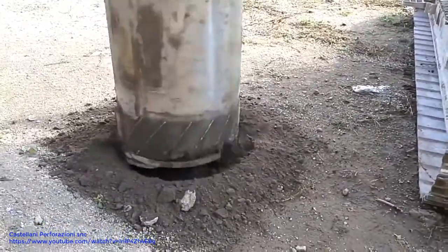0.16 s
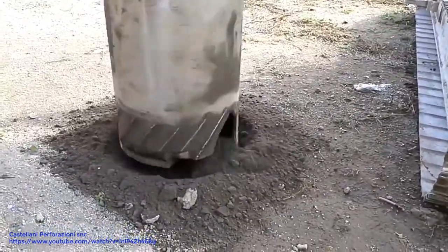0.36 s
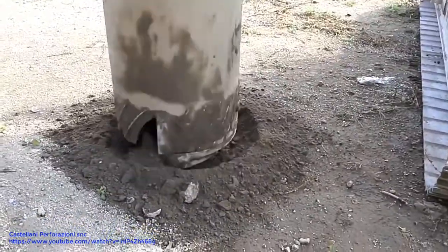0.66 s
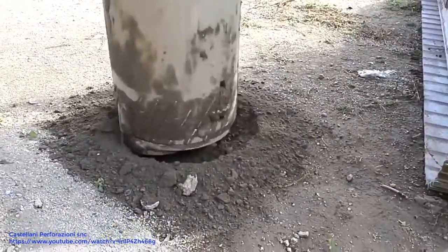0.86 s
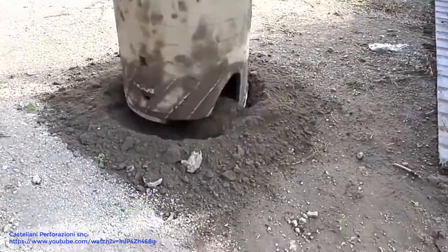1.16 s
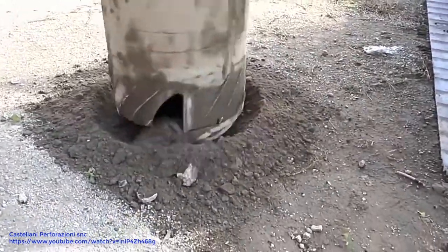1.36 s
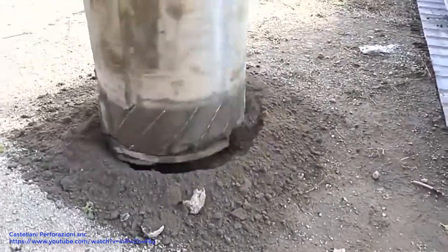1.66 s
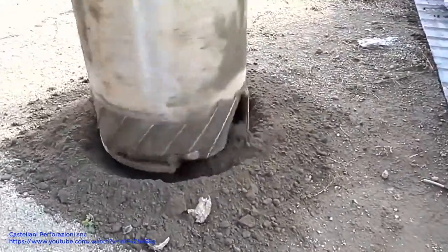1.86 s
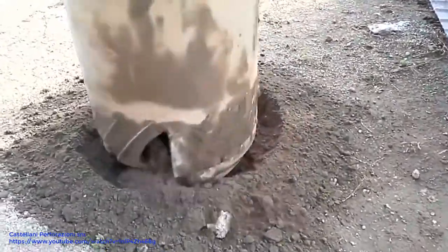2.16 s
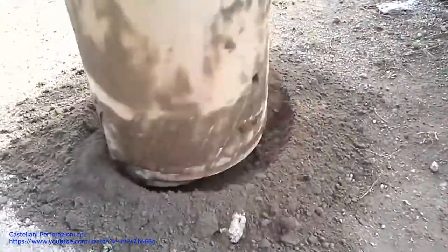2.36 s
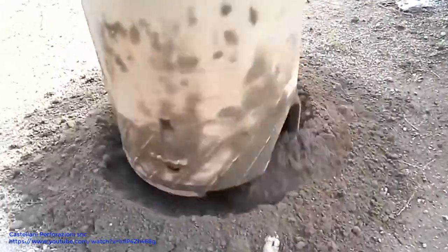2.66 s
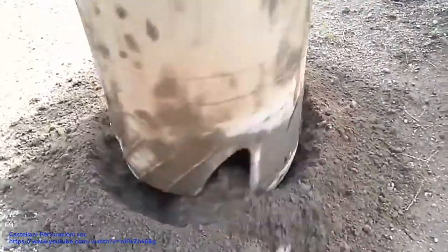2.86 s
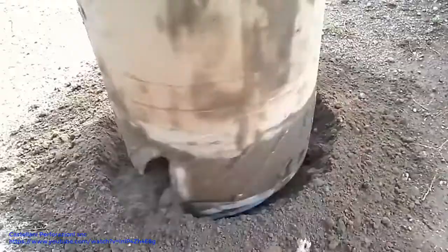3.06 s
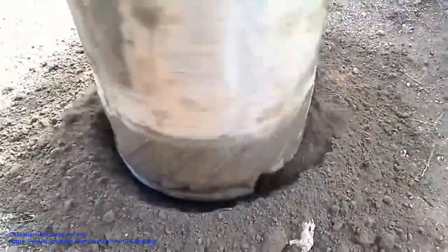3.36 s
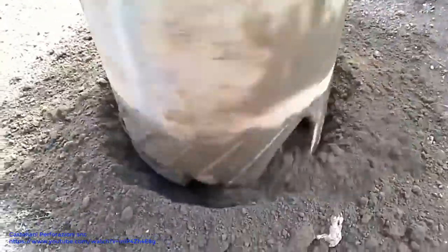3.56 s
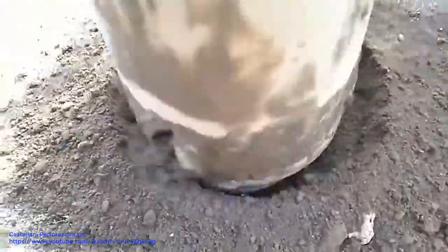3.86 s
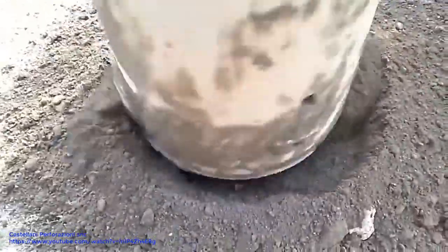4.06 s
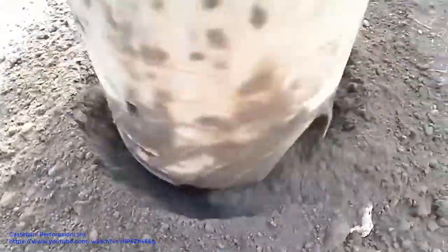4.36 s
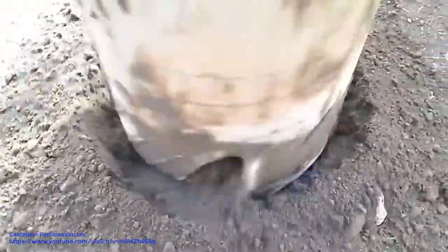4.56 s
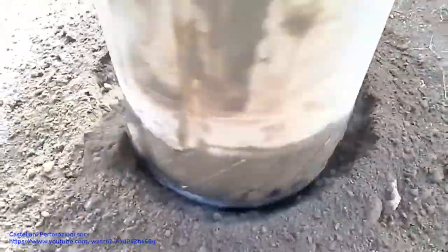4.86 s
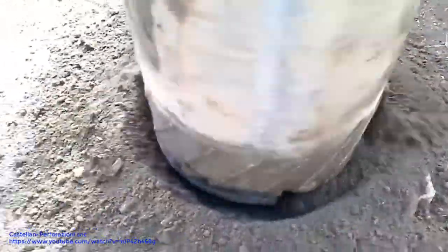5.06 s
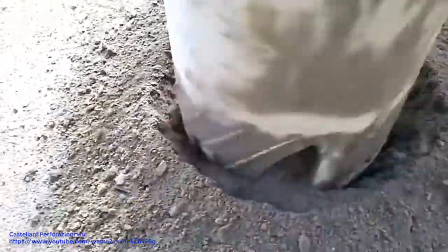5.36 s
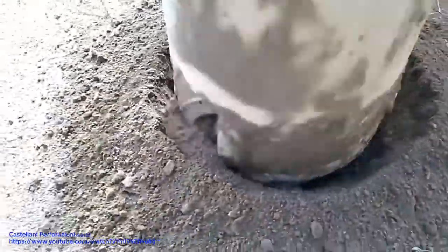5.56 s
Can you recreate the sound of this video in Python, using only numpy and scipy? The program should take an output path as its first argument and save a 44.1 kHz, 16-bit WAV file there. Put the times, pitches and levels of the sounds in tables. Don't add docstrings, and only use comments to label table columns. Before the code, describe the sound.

A diesel engine and hydraulic rotary drive run without pause, whining around a mid pitch with rough air roar and clatter. The rotating steel tube rattles and clanks irregularly from the start, with stones knocking it and faint high metallic pings. The drive whine grows on approach while the engine becomes partly hidden. Open air, dry, harsh, compressed handheld sound.

```python
import sys
import numpy as np
from scipy import signal
from scipy.io import wavfile
from scipy.ndimage import uniform_filter1d, minimum_filter1d

SR = 44100
rng = np.random.default_rng(int(sys.argv[2]) if len(sys.argv) > 2 else 0)


def field_ratio(decibels):
    return 10 ** (np.asarray(decibels, dtype=float) / 20)


def wav_record(signal):
    frames = np.transpose(np.atleast_2d(signal))
    bounded = np.clip(frames, -1, 1)
    quanta = np.round(bounded * 32767).astype(np.int16)
    wavfile.write(sys.argv[1], SR, quanta)


N = 252363

# t/s, how far the engine is hidden behind the casing (0 open, 1 hidden, above 1
# deeper in its shadow), pump effort level/dB
STANCE = [(0, 0.02, -0.5), (1.2, 0.07, 1.5), (1.6, 0.4, 0), (2.0, 0.28, -1), (2.4, 0.7, 1.5), (2.8, 0.8, 1),
          (3.2, 1.05, -1), (3.6, 1, -4), (4.0, .75, -6.5), (4.4, .85, -5), (4.8, 0.9, -11),
          (5.2, 0.7, -2.5), (5.72, 1.36, -9.5)]

CRANK_ORDERS = [1.5, 5, 6, 6.5, 10, 12, 13, 13.5, 14, 14.5, 19.5, 20, 20.5, 21, 31, 33, 34.5]
CRANK_DB = [-60, -42, -32, -37, -29, -33, -31, -36, -35, -35, -41, -36, -36, -37, -41, -44, -41]
CRANK_HZ, CRANK_SETTLES_HZ, CRANK_SETTLE_S = 33.97, .13, 2.4
FAN_BEAT_HZ, FAN_BEAT_S = 4.9, .15
FIRING_DB, FIRING_SHADE_DB, FIRING_FOLLOWS = -28, 6.5, 0.55

STROKE_DB = [-17, -28.5, -20.5]
PUMP_ORDERS = [36, 45, 54, 63, 72, 99]
PUMP_DB = [-8.5, -34, -17, -12, -8.5, -17.5]
PUMP_SHADE_DB = [11, 7, 3.7, 5, 11.3, 5.9]
THIRD_SHADE_DB, WOBBLE_ORDER = 18, 26 / 3

MOTOR_ORDERS = [1, 2, 4, 5, 4.18, 3, 6, 8]
MOTOR_DB = [-18.5, -31, -32, -33, -43, -41, -44, -45]
MOTOR_RISE_DB_PER_S = [0.72, 1.06, .65, 1.31, 2.64, 1.2, 0.71, 1.2]
MOTOR_ROUGH_DB = [1.2, 2.5, 2.0, 2.0, 2.0, 4.0, 4.0, 4.0]
GEAR_ORDERS = [2.09, 6.27, 8.36, 10.45, 12.54]
GEAR_DB = [-2.5, -4, 7, 1, -10.5]
# t/s, sag f/Hz, half-length/s
BITES = [(.08, 10, .07), (.42, 5.5, .06), (1.0, 9.5, .17), (1.49, 10.5, .08), (2.1, 10.5, .17),
         (2.62, 5.8, .09), (3.06, 18, .1), (3.35, 5.5, .12), (3.67, 8.5, .11), (4.11, 14.5, .1),
         (4.45, 9.5, .15), (4.98, 6, .14), (5.25, 3.5, .1), (5.57, 19, .2)]
# t/s, extra path of the ground echo/m, oil pressure level/dB
ECHO = [(0, 1.596, .4), (.62, 1.596, -1.9), (.89, 1.729, 1.7), (.98, 1.585, 3.5), (1.27, 1.509, -5),
        (1.58, 1.546, .5), (1.66, 1.709, -1.4), (1.97, 1.91, -.6), (2.41, 2.045, 1.6), (2.98, 2.02, -.4),
        (3.28, 1.823, 2.6), (3.7, 1.86, 1.5), (3.98, 1.655, -2.5), (4.42, 1.602, 1.6), (4.62, 1.491, 2.8),
        (5.1, 1.494, 0), (5.2, 1.456, 1), (5.72, 1.236, -2)]
FREE_HZ = 363
ECHO_SHARE, SOUND_M_PER_S = .7, 343
TOOTH_DB, TOOTH_RISE_DB_PER_S, TOOTH_DB_PER_SAG, CLOSEST_S = -57.5, 4, 0.46, 4.7

# f/Hz, level/dB per Hz
ROAR = [(30, -45.5), (60, -26), (90, -20.5), (170, -10.5), (250, -6), (340, -3), (410, -6.5), (480, 0),
        (560, -11), (720, -8), (1000, -14.5), (1460, -20.5), (2000, -39), (3200, -38.5)]
# f/Hz, level/dB per Hz
CLATTER = [(900, -3), (1300, 3), (1700, -2), (2300, -0.5), (3100, -3.5), (3700, -1), (4200, -3.5),
           (4700, -9.5), (5300, -22.5), (6500, -30.5)]
# f/Hz, level/dB per Hz
HISS = [(5000, 3.5), (6000, -0.5), (7200, -6), (8400, -6.5), (9200, -14.5), (10000, -20)]
ROAR_DB, CLATTER_DB, HISS_DB, HISS_SHADE_DB = -18.5, -23.5, -42.5, 5.5
ROAR_YIELDS, CLATTER_YIELDS = 0.11, 0.17

# t/s, rms level/dB, length/s
CRUNCH = [
    (.0, -50, .02),
    (1.536, -43, .02),
    (1.972, -50, .022),
    (3.466, -46, .008),
    (5.393, -36, .004),
    (5.515, -53, .012),
]
# t/s, peak level/dB, f/Hz, t60/s
PIN = [(.0, -38.5, 10370, 0.33), (0.191, -53, 10370, 0.21), (1.555, -49, 10200, 0.24),
       (1.569, -49, 13100, 0.27), (1.852, -39, 11800, 0.096), (3.475, -50.5, 12000, .15),
       (3.5, -46.5, 10350, 0.61), (4.03, -41.5, 10340, 0.27), (4.028, -46, 13600, 0.12),
       (4.94, -45.5, 10300, 0.3), (5.365, -50, 13800, 0.16), (5.399, -54, 10300, .2),
       (5.514, -45.5, 10270, 0.22)]
# t/s, peak level/dB, t60/s
CLANKS = [(0.0094, -6, 0.39), (0.188, -7.5, 0.24), (0.316, -11, 0.2), (0.4409, -10.5, 0.39),
          (0.9202, -12, 0.37), (1.449, -9, 0.14), (1.5274, -3, 0.22), (1.5525, -6.5, 0.18),
          (1.9694, -25, 0.14), (1.9992, -14, 0.2), (2.6216, -1.5, 0.093), (2.9005, -12, 0.16),
          (3.04, -10, 0.21), (3.1926, -9.5, 0.17), (3.472, -4.5, 0.19), (4.0337, -9.5, 0.18),
          (4.5505, -18, 0.53), (4.93, -12.5, 0.35), (5.0599, -19, 0.2), (5.3694, -10.5, 0.29),
          (5.5154, -3, 0.23), (5.5794, -18, 0.2)]
# f/Hz, level/dB per Hz
CLANK = [(900, -7), (2000, 1.5), (3000, 1.5), (4000, 6.5), (5000, -6.5), (6500, -15.5), (9000, -33),
         (10500, -29)]
# t/s, peak level/dB, pitch f/Hz, t60/s
KNOCKS = [
    (0.119, -7, 697, 0.048),
    (0.623, -2.5, 515, 0.084),
    (1.449, -11, 681.5, 0.11),
    (3.848, -9.5, 441, 0.084),
    (4.169, -5, 582, 0.058),
    (5.096, -0.5, 740, 0.023),
    (5.519, -6, 702, 0.078),
]
# t/s, peak level/dB
GRIT = [
    (3.045, -37.5),
    (3.4177, -14),
    (5.718, -44),
]


def rms_one(x):
    return x / np.sqrt(np.mean(x ** 2) + 1e-20)


def in_time(rows):
    s, *columns = np.transpose(rows)
    return [np.interp(np.arange(N) / SR, s, column) for column in columns]


def drift(rate):
    r = np.exp(-80 * np.pi * rate / SR)
    noise = rng.standard_normal(N // 40 + 2002)
    slow = signal.lfilter([1], [1, -2 * r, r * r], noise)[2000:]
    return np.interp(np.arange(N) / 40, np.arange(len(slow)), rms_one(slow))


def coloured(spectrum, patchy_db, count):
    hz, db = np.transpose(spectrum)
    edges = hz[0] * 2 ** np.arange(0, np.log2(hz[-1] / hz[0]), 1 / count)
    white = rng.standard_normal((2, N))
    out = 0
    for k, (low, high) in enumerate(zip(edges, edges[1:])):
        band_pass = signal.butter(3, [low, high], "band", fs=SR, output="sos")
        band = signal.sosfilt(band_pass, white[k % 2])
        level_db = np.interp(np.log(low * high) / 2, np.log(hz), db)
        out = out + field_ratio(level_db + patchy_db * drift(9.6)) * band
    return rms_one(out)


def turns(hz):
    return 2 * np.pi * np.cumsum(hz) / SR


def line(phase, db, rough_db):
    waver = .08 * rough_db * drift(12)
    level = np.sqrt(2) * field_ratio(db + rough_db * drift(18))
    return level * np.sin(phase + waver + rng.uniform(0, 2 * np.pi))


def strikes(times, db):
    clicks = np.full(N, 1e-18)
    clicks[np.minimum((np.asarray(times) * SR).astype(int), N - 1)] = field_ratio(db)
    return clicks


def ring(clicks, hz, t60):
    r = field_ratio(-60 / (t60 * SR))
    w = 2 * np.pi * hz / SR
    return signal.lfilter([0, np.sin(w)], [1, -2 * r * np.cos(w), r * r], clicks)


def diesel(crank, firing_db):
    beat = 2 * np.pi * FAN_BEAT_HZ * (np.arange(N) / SR - FAN_BEAT_S)
    firing = 3 * crank
    out = np.sqrt(2) * field_ratio(firing_db) * (np.sin(firing) + field_ratio(-5.0) * np.sin(firing - beat))
    facing_db = 0.091 * (firing_db - np.mean(firing_db))
    for k, db in zip(CRANK_ORDERS, CRANK_DB):
        out = out + line(k * crank, db + facing_db, rough_db=2.0)
    return out


def pump(crank, effort_db, hidden):
    first_db = STROKE_DB[0] + effort_db
    third_db = STROKE_DB[2] - THIRD_SHADE_DB * hidden
    out = line(9 * crank, first_db, rough_db=.8)
    out += line(18 * crank, STROKE_DB[1], rough_db=2.0)
    out += line(27 * crank, third_db, rough_db=1.2)
    out += line(WOBBLE_ORDER * crank, first_db - 11, rough_db=1.5)
    for k, db, shade_db in zip(PUMP_ORDERS, PUMP_DB, PUMP_SHADE_DB):
        out += line(k * crank, db - 21.5 - shade_db * hidden, rough_db=2.1)
    return out


def sag():
    time = np.arange(N) / SR
    return sum(hz * np.exp(-.5 * ((time - s) / length) ** 2) for s, hz, length in BITES)


def echo_db(hz, path):
    lag = 2 * np.pi * hz * path / SOUND_M_PER_S
    return 10 * np.log10(1 + ECHO_SHARE ** 2 + 2 * ECHO_SHARE * np.cos(lag))


def rotary_drive():
    time = np.arange(N) / SR
    lost = sag()
    path, oil_db = in_time(ECHO)
    motor_hz = FREE_HZ - lost
    shaft = turns(motor_hz)
    out = 0
    for k, db, rise, rough in zip(MOTOR_ORDERS, MOTOR_DB, MOTOR_RISE_DB_PER_S, MOTOR_ROUGH_DB):
        place_db = rise * time + echo_db(k * motor_hz, path)
        pressure_db = min(0.2 * k, 1) * oil_db
        out = out + line(k * shaft, db + place_db + pressure_db, rough_db=rough)
    approach_db = TOOTH_RISE_DB_PER_S * np.minimum(time, CLOSEST_S)
    load_db = TOOTH_DB + approach_db + TOOTH_DB_PER_SAG * np.minimum(lost, 13)
    backlash = 0.19 * drift(72)
    for k, db in zip(GEAR_ORDERS, GEAR_DB):
        out = out + line(k * (shaft + 0.62 * backlash), db + load_db, rough_db=2.2)
    return out


def rig_noise(crank, hidden):
    whine_db = uniform_filter1d(echo_db(FREE_HZ, in_time(ECHO)[0]), size=8001)
    roar_db = ROAR_DB - ROAR_YIELDS * whine_db + 2.5 + 0.18 * np.cos(9 * crank) + 0.72 * drift(10.0)
    clatter_db = CLATTER_DB - CLATTER_YIELDS * whine_db + 1.5 + 0.29 * np.cos(3 * crank) + 1.27 * drift(10)
    out_of_sight = np.maximum.accumulate(hidden) ** 2
    hiss_db = HISS_DB - HISS_SHADE_DB * out_of_sight + 2.0 + 1.1 * drift(17.0)
    roar = field_ratio(roar_db) * coloured(ROAR, patchy_db=1.56, count=3)
    clatter = field_ratio(clatter_db) * coloured(CLATTER, patchy_db=1.0, count=6)
    return roar + clatter + field_ratio(hiss_db) * coloured(HISS, patchy_db=3.0, count=5)


def crunch():
    time = np.arange(N) / SR
    spray = 0
    for s, db, length in CRUNCH:
        past_end = np.maximum(time - s - length, 0)
        spray = spray + field_ratio(db - 420 * past_end ** .6) * (time >= s)
    grains = rng.standard_normal(N) * field_ratio(4 * drift(300))
    bright = signal.sosfilt(signal.butter(4, [7500, 14800], "band", fs=SR, output="sos"), grains)
    return spray * rms_one(bright)


def pin():
    out = 0
    for s, db, hz, t60 in PIN:
        blow = ring(strikes([s], db - 27.5), hz, 0.0078)
        out = out + ring(blow, hz, t60)
    return out * field_ratio(3.4 * drift(25))


def clanks():
    time = np.arange(N) / SR
    body = 0
    for s, db, t60 in CLANKS:
        age = np.maximum(time - s + 0.0087, 0)
        body = body + field_ratio(db - 7.5 - 60 * age / t60) * (1 - np.exp(-age / 0.0055))
    return body * field_ratio(2.3 * drift(150)) * coloured(CLANK, patchy_db=2.5, count=5)


def knocks():
    out = 0
    for (s, db, hz, t60), chance in zip(KNOCKS, rng.random((len(KNOCKS), 8))):
        blows = strikes(s + .022 * chance[:4] ** 2, db - 1.5 - 6 * chance[4:])
        soft = signal.lfilter([.12], [1, -.88], blows)
        out = out + ring(soft, .7 * hz, t60) + ring(soft, hz, t60) + ring(soft, 1.45 * hz, 0.3 * t60)
    return signal.sosfilt(signal.butter(2, 250, "high", fs=SR, output="sos"), out)


def grit():
    s, db = np.transpose(GRIT)
    return -signal.lfilter([1], [1, -.6], strikes(s, db + 12.5))


def scene():
    hidden, effort_db = in_time(STANCE)
    settling = np.exp(-np.arange(N) / SR / CRANK_SETTLE_S)
    crank = turns(CRANK_HZ + CRANK_SETTLES_HZ * settling)
    firing_db = FIRING_DB - FIRING_SHADE_DB * hidden + FIRING_FOLLOWS * effort_db
    rig = diesel(crank, firing_db) + field_ratio(0.37) * pump(crank, effort_db, hidden)
    rig = rig + rotary_drive() + rig_noise(crank, hidden)
    casing = crunch() + pin() + clanks() + knocks()
    return (rig + casing + grit())[None]


def top_cut(x):
    return signal.sosfilt(signal.butter(12, 15830, fs=SR, output="sos"), x)


def record(dry):
    x = signal.sosfilt(signal.butter(2, 70, "high", fs=SR, output="sos"), dry)
    ceiling = .997
    duck = minimum_filter1d(np.minimum(1, ceiling / (np.abs(x) + 1e-9)), size=97)
    duck = uniform_filter1d(uniform_filter1d(duck, size=65), size=65)
    return top_cut(x * duck)


dry = scene()
out = record(dry)
wav_record(out)
```